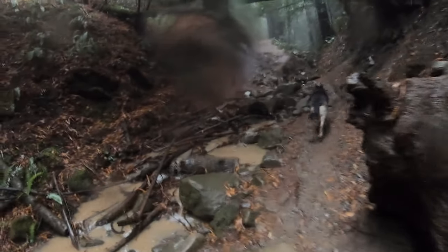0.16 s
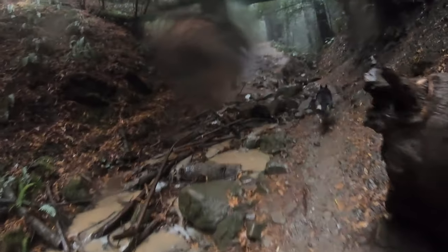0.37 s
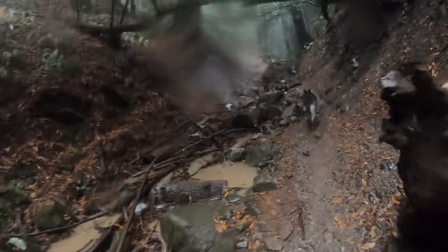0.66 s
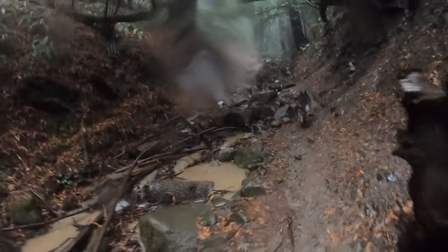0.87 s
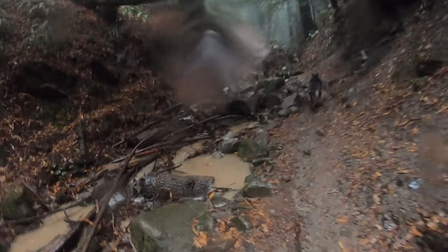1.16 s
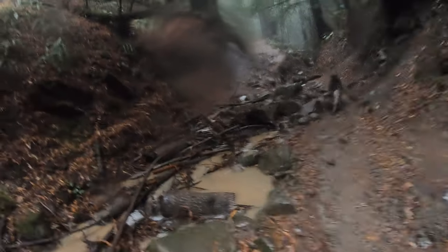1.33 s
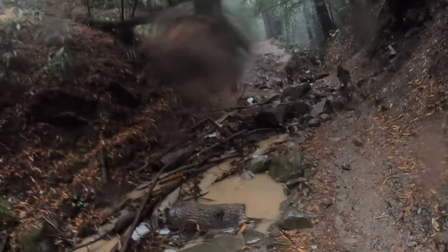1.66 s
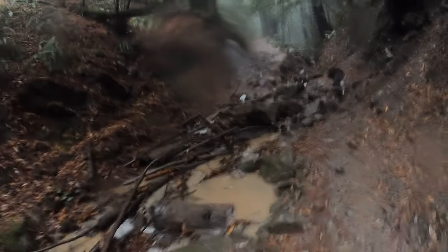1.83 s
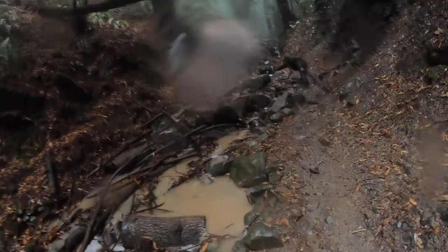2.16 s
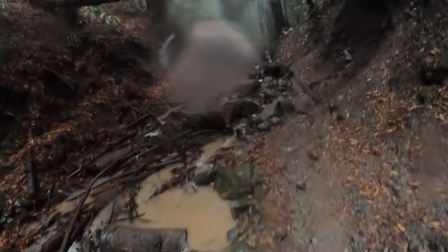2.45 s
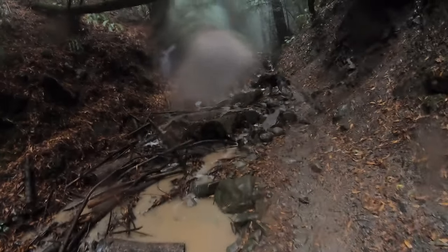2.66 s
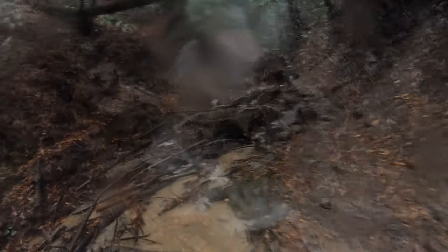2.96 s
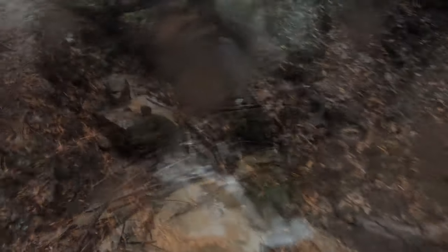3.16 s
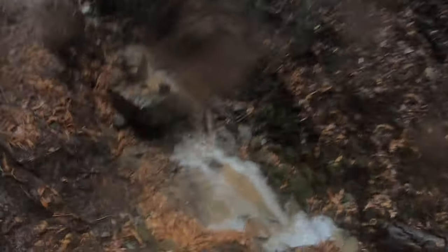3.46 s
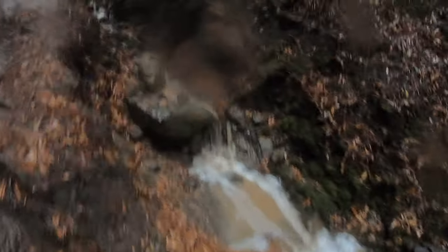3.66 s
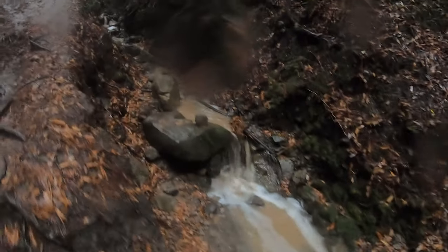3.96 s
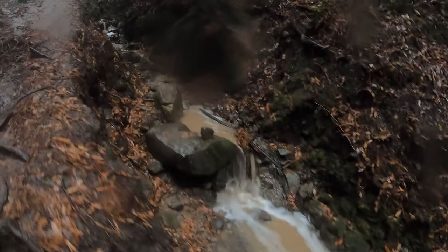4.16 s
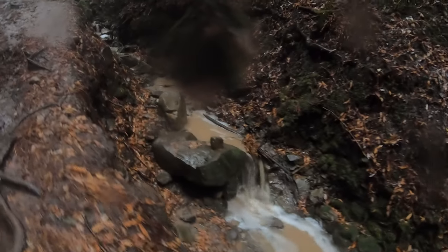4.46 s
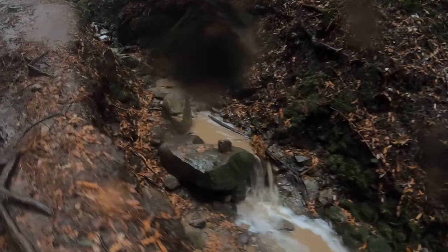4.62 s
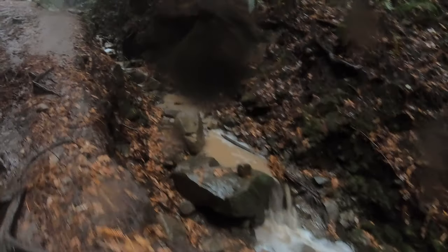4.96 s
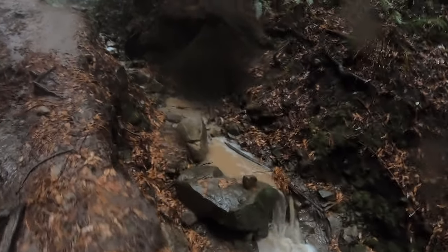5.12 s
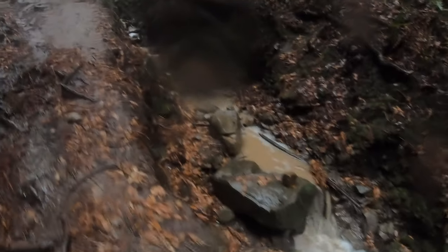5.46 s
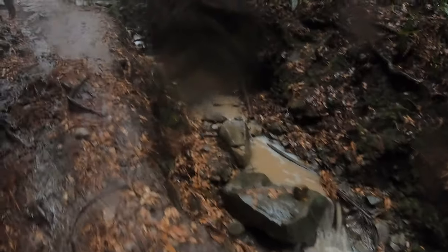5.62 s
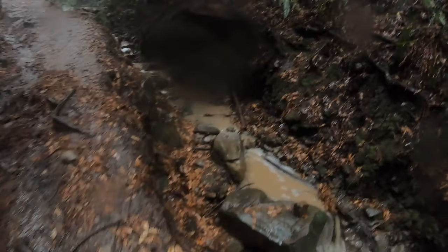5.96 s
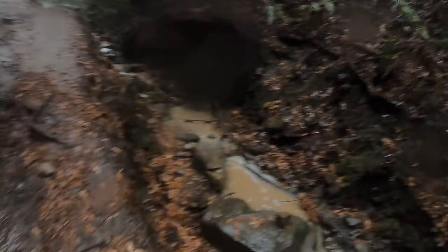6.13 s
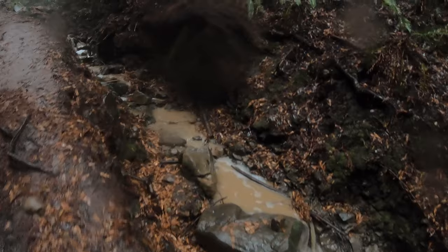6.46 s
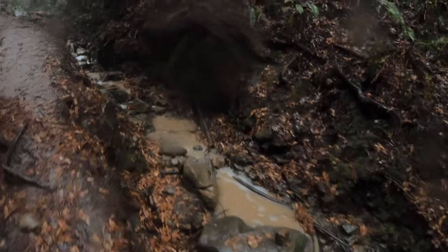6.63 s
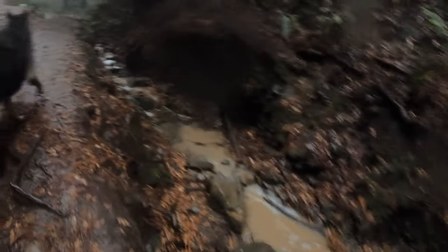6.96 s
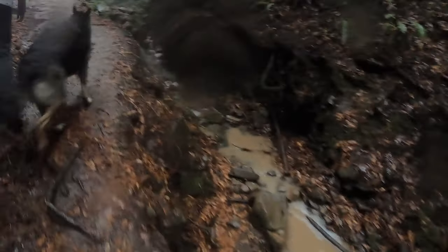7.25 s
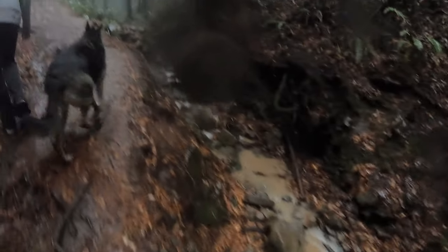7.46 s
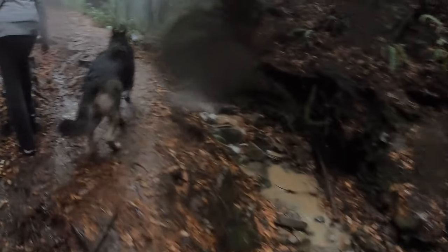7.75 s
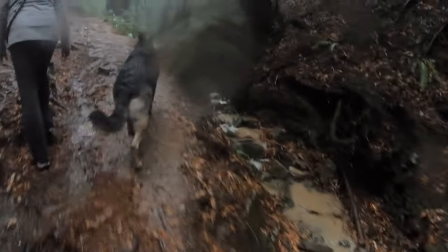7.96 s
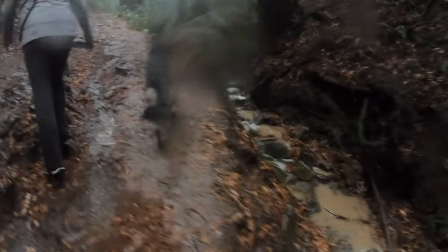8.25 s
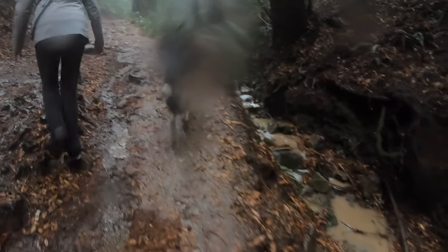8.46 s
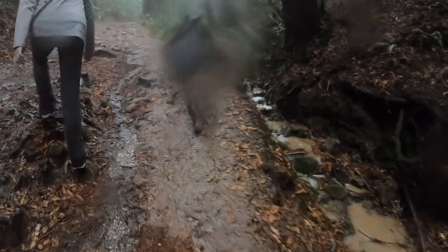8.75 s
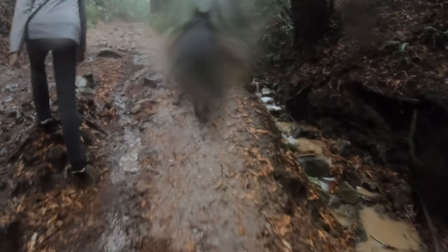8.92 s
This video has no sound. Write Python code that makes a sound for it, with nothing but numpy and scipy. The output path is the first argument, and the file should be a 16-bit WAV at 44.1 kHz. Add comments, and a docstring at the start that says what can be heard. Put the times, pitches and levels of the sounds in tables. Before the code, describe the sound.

Someone walks past a rocky creek in a rainy forest, carrying a small microphone. Water rushes and hisses throughout over a hollow gurgle, dotted with sharp drips and soft plops. Dull steps, brief mount rattles and wind gusts mark the first half. The sound leans right at first and evens out as the muffled left side clears. The creek swells midway, then recedes slightly, its gurgle deepening.

```python
"""A forest creek in the rain rushes, bubbles and gurgles over rocks, while drops tick and plop nearby.
A walker carries a small camera past it; the steps thud through its body and rattle its mount.
Low wind rumbles underneath. The left microphone port (its sound opening) is muffled by water and
clears in two stages; at times the camera feeds the left port to both channels."""
import sys
import numpy as np
from scipy import signal
from scipy.fft import rfft, irfft, next_fast_len
from scipy.io import wavfile
from scipy.ndimage import uniform_filter1d, map_coordinates

SR = 44100
rng = np.random.default_rng(int(sys.argv[2]) if len(sys.argv) > 2 else 0)


def waveform_to_disk(signal):
    """Save audio, clipped to [-1, 1], as 16-bit WAV at the path in sys.argv[1]."""
    frames = np.transpose(np.atleast_2d(signal))
    scaled = np.clip(frames, -1, 1) * 32767
    samples = np.round(scaled).astype(np.int16)
    wavfile.write(sys.argv[1], SR, samples)


N = 400869

# the creek as the walker passes: (time [s], rush [dB], spray [dB], finest hiss [dB], gurgle [dB])
CREEK_LEVELS = [(0, -42.5, -41.5, -72, -52), (1.0, -44.5, -42, -74, -51.5), (2.1, -43.5, -41.5, -73, -50),
                (3.0, -46, -44.5, -75, -53.5), (3.5, -39.5, -40.5, -69, -49.5), (3.95, -37, -38, -69, -47),
                (4.4, -38, -38, -68, -51.5), (4.7, -38.5, -39, -66, -49), (4.87, -37.5, -39.5, -66, -44),
                (5.05, -39, -39.5, -65, -49), (5.35, -40, -40, -66, -48.5), (5.75, -40.5, -40, -67, -54.5),
                (6.25, -39, -40.5, -67, -55), (6.9, -42, -40, -67, -53), (7.5, -42.5, -43, -66.5, -53),
                (8.3, -45, -46, -69, -55), (9.09, -44.5, -46, -71, -51.5)]
FINE_HISS_HZ = 11550  # the finest hiss lies above this; the channels blend only below it


def creek(half_clear, clear, turned):
    """Running water as each port hears it: a low rush, a bright spray and a very fine hiss."""
    # tone of the water at the wet, half clear and clear left port: (frequency [Hz], level [dB])
    wet_tone = [(300, 3.5), (600, -5.5), (1000, -10.5), (2000, -11), (3000, -12), (4500, -26), (6000, -22),
                (7800, -26), (9500, -31), (11000, -34.8), (13000, -37), (15000, -46.9)]
    half_tone = [(300, -1), (700, -7), (950, -4), (1350, -8), (1850, -5), (2800, -12.4), (3900, -11.5),
                 (4800, -19.5), (6200, -35), (7800, -29), (9200, -32.5), (10900, -46), (12000, -43),
                 (15000, -43)]
    clear_tone = [(300, -0.5), (620, -5), (1090, 0), (1380, -7.5), (1800, -3), (2310, -10.5), (3300, -14.5),
                  (4100, -3.5), (6000, -1), (7000, -16), (8500, -17), (11000, -35.5), (12000, -33),
                  (15000, -34)]
    # tone at the right port, facing the trail and facing the creek: (frequency [Hz], level [dB])
    trail_tone = [(300, 4.5), (550, -1.5), (1100, -1), (1500, -3), (2000, -2), (3000, -6.5), (4200, -14),
                  (5200, -6.5), (6200, 1.1), (7200, -3.5), (8500, -13.5), (10000, -20.5), (12000, -29.5),
                  (15000, -40.7)]
    creek_tone = [(300, 0), (700, -5.5), (1050, -7.5), (1600, -1.5), (2200, -8), (2800, -3), (4100, -15.5),
                  (6300, 4), (7200, 0), (8000, -10.5), (8600, -6.5), (10300, -22), (12500, -35),
                  (15000, -36.3)]
    # spray on the left compared with the right: (wet [dB], half clear [dB], clear [dB])
    left_spray_db = [-22.5, -14, -5]
    rush_db, spray_db, hiss_db, _ = curves(CREEK_LEVELS)
    rush_rise_db, spray_rise_db = spurts()
    rush_db, spray_db = rush_db + rush_rise_db, spray_db + spray_rise_db
    to_left, to_right, flurry_db = water()
    left_shares = [1 - half_clear - clear, half_clear, clear]
    left = port([to_left] * 3, [wet_tone, half_tone, clear_tone], left_shares,
                rush_db - 7, [spray_db + db for db in left_spray_db])
    right = port(to_right, [trail_tone, creek_tone], [1 - turned, turned], rush_db, [spray_db] * 2)
    hiss = unit(filtered(to_right[0], lambda hz: above(hz, FINE_HISS_HZ, 40) * below(hz, 14800, 30)))
    flicker_db = 0.88 * flurry_db + 0.65 * wobble(14)
    right = filtered(right, lambda hz: below(hz, FINE_HISS_HZ, 40))
    return np.array([left, right + amp(hiss_db + spray_rise_db + flicker_db) * hiss])


def water():
    """Rushing noise, ringing bubbles and rain ticks; the two ports share only part of this sound."""
    # how alike the two ports sound: (frequency [Hz], likeness [0-1])
    likeness = [(150, 0.99), (700, 0.5), (2000, 0.52), (4500, 0.47), (7000, 0.21), (12000, .05)]
    # how far the right port's wave runs ahead, facing trail or creek: (frequency [Hz], phase [radians])
    trail_lead = [(700, 0), (1380, -1.4), (1900, -0.2), (2400, 1.1), (3100, 4.1), (3800, 4.5), (4500, 7.5),
                  (5200, 7.5), (6000, 9), (9000, 12)]
    creek_lead = [(900, .5), (1380, -0.9), (1900, -1.2), (2400, 1), (3100, 4.5), (3800, 6.5), (4500, 11),
                  (6000, 9.5), (9000, 8)]
    bubbles = shower(count=2500, centre_hz=1202.4, spread=0.2432, spiky_db=2,
                     cycles=6.64, rise=0.0507, size=900)
    ticks = [shower(count=6000, centre_hz=7160, spread=0.191, spiky_db=3.5, cycles=0.71, rise=0, size=60)
             for side in "LR"]
    shared, right_only = patchy_noise(depth_db=1.27)
    glugs = shower(count=500, centre_hz=653.4, spread=.3, spiky_db=2.5, cycles=9.7, rise=0.0406, size=2000)
    fizz = shower(count=9000, centre_hz=4500, spread=.35, spiky_db=2.5, cycles=12.2, rise=0.02, size=300)
    shared += amp(-16.5) * bubbles + amp(-21) * glugs + amp(-10) * fizz + amp(-13) * ticks[0]
    alike = [filtered(shared, lambda hz: along(likeness, hz) * np.exp(1j * along(lead, hz)))
             for lead in (trail_lead, creek_lead)]
    unlike = filtered(right_only, lambda hz: np.sqrt(1 - along(likeness, hz) ** 2))
    right = np.array(alike) + unlike + amp(-11) * ticks[1]
    flurry_db = 0.42 * wobble(9) + flurries(count=170, jump_db=3.0, fade_s=0.015)
    return shared * amp(flurry_db), right * amp(flurry_db), flurry_db


def port(waters, tones, shares, rush_db, sprays_db):
    """A port colours the water with a changing mix of tones; it rings in the bright spray range."""
    spray_hz = 3710  # rush lies below, spray above
    out = 0
    for sound, tone, share, spray_db in zip(waters, tones, shares, sprays_db):
        colour = lambda hz: amp(along(tone, hz)) * above(hz, 240, 4)
        rush = unit(filtered(sound, lambda hz: colour(hz) * below(hz, spray_hz, 12)))
        spray = unit(filtered(sound, lambda hz: colour(hz) * above(hz, spray_hz, 12)))
        out = out + np.clip(share, 0, 1) * (amp(rush_db) * rush + amp(spray_db) * spray)
    return out


def spurts():
    """Sudden rises in rush and spray that trail off, as of wet leaves brushed or water flung."""
    # each spurt: (time [s], length [s], rise of rush [dB], rise of spray [dB])
    bursts = [(0.3, 0.028, 2.5, 10.5), (0.927, 0.0062, 2, 7), (1.372, 0.074, 3.5, 4),
              (1.875, 0.032, 1.5, 0.5), (1.925, 0.014, 5.5, 0), (3.894, 0.0022, 4, 11),
              (6.223, 0.0034, 3, 7), (6.291, .004, 2, 6)]
    rise_db = np.zeros((2, N))
    for start, length, rush_db, spray_db in bursts:
        t = np.arange(round(3 * length * SR)) / SR
        fade = 1 / (1 + (t / length) ** 3)
        at = round(start * SR)
        rise_db[:, at:at + len(t)] += np.outer([rush_db, spray_db], fade)
    return uniform_filter1d(rise_db, size=20)


def flurries(count, jump_db, fade_s):
    """Short showers of spray make the water's level jump at random and sink back."""
    when, strength = rng.random((count, 2)).T
    jumps = np.bincount((when * N).astype(int), jump_db * strength, N)
    fade = np.exp(-np.arange(SR // 5) / SR / fade_s)
    return signal.fftconvolve(jumps, fade)[:N]


def gurgle():
    """The hollow gurgle of falling water, which deepens as the walker leaves it behind."""
    # tone of the gurgle from near and from far: (frequency [Hz], level [dB])
    near_tone = [(60, -120), (105, -32), (135, 0.5), (190, 4), (250, -2), (330, -24.5), (500, -25),
                 (900, -120)]
    far_tone = [(70, -120), (105, -32), (128, 0.5), (165, 4.5), (220, -3), (300, -21), (500, -24),
                (900, -120)]
    leave_s, gone_s = 6.6, 7.93
    far = np.interp(np.arange(N) / SR, [leave_s, gone_s], [0, np.pi / 2])
    shared, right_only = np.cos(far) * toned_noise(near_tone) + np.sin(far) * toned_noise(far_tone)
    swell = amp(1.33 * wobble(13) + 1.9 * wobble(5))
    sound = unit(swell * np.array([shared, shared + .5 * right_only]))
    *_, gurgle_db = curves(CREEK_LEVELS)
    return amp(gurgle_db) * sound * amp([[0.1], [2.5]])


def raindrops(clear):
    """Nearby drops tick in the narrow band where the ports ring; water on the left port dims them."""
    # each drop: (time [s], level [dB], pitch [Hz])
    drops = [(0.196, -27, 6060), (0.3017, -33, 6690), (0.5566, -33, 7060), (0.942, -25, 6460),
             (1.0156, -31, 6210), (1.3857, -28, 6200), (1.4032, -25, 6160), (1.6094, -21.5, 6100),
             (2.2283, -35, 6370), (2.3675, -32, 6290), (2.9836, -34, 6050), (4.5191, -27, 6960),
             (6.1424, -37, 4370), (6.2856, -25, 5640), (6.288, -17, 5620), (6.2899, -25, 5510),
             (6.6382, -24, 4733), (6.6543, -26, 5090), (6.9546, -29, 5460), (7.0259, -31, 5067),
             (7.1013, -32, 5700), (7.225, -27.5, 5010), (7.4769, -18.5, 4640), (7.8296, -30, 5500),
             (8.607, -30, 5100), (8.7023, -30, 6010)]
    low_hz, high_hz, wet_db = 3800, 7400, -15
    ticks = splashes(*np.transpose(drops), cycles=1.7, rebound_db=-5.5)
    ticks = filtered(ticks, lambda hz: above(hz, low_hz, 10) * below(hz, high_hz, 10))
    return np.array([ticks * amp(8.5 + wet_db * (1 - clear)), ticks * amp(11.5)])


def plops():
    """Low plops and taps on mud, puddles and pebbles, louder on the right."""
    # each plop: (time [s], level [dB], pitch [Hz], fade time [cycles])
    hits = [(.187, -39, 1920, 2.7), (1.34, -41.5, 692, 4.8), (1.687, -29, 416, 0.97),
            (1.924, -33, 890, 0.52), (2.654, -34.5, 1490, 0.88), (2.655, -35, 465, 1.8),
            (2.92, -29, 370, 2.2), (3.68, -36.5, 844, 7.1), (4.044, -28, 417, 1.8), (4.578, -35, 230, 1.5),
            (5.039, -38, 1410, 2.3), (5.285, -31, 302, 2.1), (5.315, -37, 335, 2.5), (5.56, -42, 780, 4.8),
            (5.639, -32, 1890, 2.7), (6.1, -32, 1780, 2.6), (6.199, -34, 247, 1.4),
            (6.29, -34, 740.5, 1.52), (6.475, -31, 1140, 2.6), (6.718, -37, 230, 1.4),
            (7.733, -35.5, 1656, 4), (8.699, -35.5, 286.2, 1.7)]
    return splashes(*np.transpose(hits), rebound_db=-1) * amp([[0], [11]])


def splashes(times, db, hz, cycles, rebound_db):
    """A landing drop rings briefly, then rebounds more weakly."""
    rebound_s = 0.00129
    hit = rings(times, amp(db), hz, cycles, size=2000)
    return hit + amp(rebound_db) * np.roll(hit, round(rebound_s * SR))


def footsteps(clear):
    """Steps thud softly through the camera body; the left port hears less, above all when wet."""
    # each thud: (time [s], level [dB], pitch [Hz])
    steps = [(0.332, -39, 125), (0.374, -29, 88), (0.41, -34, 55), (0.485, -31, 103), (0.59, -19.5, 123),
             (0.637, -34, 123), (0.721, -33, 174), (0.774, -29, 142), (0.952, -27.5, 103), (1.19, -36, 150),
             (1.688, -20.5, 152), (1.751, -26, 109), (2.08, -27, 145), (2.116, -8.5, 114),
             (2.152, -21.5, 106), (2.312, -30, 170), (2.7, -32.5, 160), (3.166, -28, 135),
             (3.429, -34, 120), (4.66, -40, 173), (4.821, -28, 151), (4.866, -23, 131), (4.911, -34, 133),
             (4.956, -32, 135), (5.259, -31, 162), (5.307, -27, 126), (5.56, -34, 140), (6.3, -46, 85),
             (6.72, -41, 95), (6.945, -40, 83), (7.95, -44, 80), (8.75, -41, 80)]
    times, db, hz = np.transpose(steps)
    thuds = rings(times, amp(db + 6.5), hz, cycles=1.6, size=4000, contact_s=0.00782)
    return np.array([amp(-30 + 20 * clear) * thuds, thuds])


def mount_knocks():
    """Each knock rings the camera mount and shakes the two ports in opposite directions."""
    # the mount's natural notes: (pitch [Hz], level [dB], time to fade by 60 dB [s])
    notes = [(233, -7.5, 0.067), (318.6, 3.5, 0.057), (447.6, 4, 0.037), (593, -6, 0.024), (719, -1, 0.027),
             (900, -8, 0.015)]
    times, knock_db = mount_contacts()
    scatter_db = rng.normal(0, 0.36, (len(times), len(notes)))
    hard_db = -14  # knocks softer than this sound duller
    tilt_db = 0.45 * np.minimum(knock_db - hard_db, 0)
    out = np.zeros((2, N))
    for (hz, note_db, fade_s), random_db in zip(notes, scatter_db.T):
        octaves = np.log2(hz / 330)
        gain = amp(knock_db + tilt_db * octaves + note_db + random_db)
        cycles = hz * fade_s / np.log(1000)
        note = rings(times, gain, np.full(len(times), hz), cycles, size=2500, contact_s=0.00415)
        out[0] -= amp(-10.5 + 1.5 * octaves) * note  # the left feels less, least of the low notes
        out[1] += note
    return out


def mount_contacts():
    """Times and levels of all knocks; a rattle is a quick, uneven run that swells and fades."""
    # single knocks: (time [s], level [dB])
    knocks = [(0.588, -5), (0.596, -13), (0.774, -15.5), (0.788, -28), (2.112, -2), (2.127, -2.5),
              (3.145, -10), (3.162, -4), (3.176, -29), (4.868, -23.5), (4.948, -28.5), (5.281, -30)]
    # rattles: (time [s], length [s], level [dB])
    rattles = [(0.605, 0.039, -22), (0.693, 0.061, -28.5), (2.077, 0.041, -25), (2.14, 0.059, -30),
               (2.278, 0.065, -25.5), (2.691, 0.039, -25), (4.82, 0.066, -25), (5.282, .055, -28)]
    gap_s, hits = .011, 7
    start, length, rattle_db = np.transpose(rattles)[:, :, None]
    jitter, scatter = rng.normal(0, 1, (2, len(rattles), hits))
    delay = gap_s * (np.arange(hits) + .5 + .15 * jitter)
    swell = np.sin(np.pi * np.clip(delay / length, 0, 1)) + 1e-6
    level_db = rattle_db + 20 * np.log10(swell) + 1.5 * scatter
    return np.hstack([np.transpose(knocks), [(start + delay).ravel(), level_db.ravel()]])


def wind():
    """Gusts make a deep rumble and a slightly higher shudder, from separate noise at each port."""
    # strength of the gusts: (time [s], level [dB])
    gusts = [(0.0, -56), (0.17, -65), (0.38, -40.5), (0.91, -58), (0.93, -41.5), (1.41, -62), (1.8, -38),
             (1.92, -67), (2.15, -29.5), (2.25, -59), (2.76, -64), (2.81, -50), (3.82, -62), (5.32, -48),
             (5.62, -78), (5.9, -56), (8.45, -78), (9.09, -75)]
    # tone of the rumble and of the shudder: (frequency [Hz], level [dB])
    rumble_tone = [(15, -13), (30, 10.5), (50, 6.5), (75, -16), (200, -120)]
    shudder_tone = [(30, -62), (55, 6), (80, 4), (115, -2), (140, -29), (300, -120)]
    rumble_db, = curves(gusts)
    calm_db = -55
    shudder_db = -63 + 0.4 * (rumble_db - calm_db)
    buffeting = amp(2.2 * wobble(3.6) + np.array([3.7 * wobble(11), 1.4 * wobble(9)]))
    rumble = amp(rumble_db) * unit(buffeting * toned_noise(rumble_tone))
    shudder = amp(shudder_db) * unit(buffeting * toned_noise(shudder_tone))
    return (rumble + shudder) * amp([[-5], [4.5]])


def rings(times, gain, hz, cycles, size, rise=0, contact_s=0):
    """Fading notes, size samples long; rise bends the pitch up, and the wave crests at contact_s."""
    t = np.arange(size) / SR
    age = t * (hz / cycles)[:, None]
    envelope = np.exp(-age) * (1 - np.exp(-5 * age)) ** 2
    wave = np.cos(2 * np.pi * hz[:, None] * (t * (1 + rise * age) - contact_s))
    at = np.round(times * SR).astype(int)[:, None] + np.arange(size)
    return np.bincount(at.ravel(), (gain[:, None] * envelope * wave).ravel(), N + size)[:N]


def shower(count, centre_hz, spread, spiky_db, cycles, rise, size):
    """Many tiny rings at random times and pitches; spiky_db makes a few stand out."""
    when, softness, pitch = rng.random((count, 3)).T
    hz = np.clip(centre_hz * (pitch / (1 - pitch)) ** spread, 200, 14000)
    gain = amp(-spiky_db * np.log(softness + 0.023))
    return unit(rings(when * N / SR, gain, hz, cycles, size, rise))


def patchy_noise(depth_db):
    """Two noises whose loudness varies in small patches of time and frequency."""
    spectrum = signal.stft(rng.standard_normal((2, N)), nperseg=512)[2]
    patches = rng.standard_normal(spectrum.shape[1:])
    patches = uniform_filter1d(uniform_filter1d(patches, 8, axis=0), 8, axis=1)
    spectrum *= amp(depth_db * patches / patches.std())
    return unit(signal.istft(spectrum, nperseg=512)[1][:, :N])


def toned_noise(tone):
    """Two separate noises shaped by the same tone table."""
    return filtered(rng.standard_normal((2, N)), lambda hz: amp(along(tone, hz)))


def amp(db):
    """Turn decibels into a gain to multiply by."""
    return 10 ** (np.asarray(db) / 20)


def unit(x):
    """Scale a sound to an average power of 1."""
    return x / np.sqrt(np.mean(x ** 2, axis=-1, keepdims=True) + 1e-20)


def along(points, hz):
    """Read between the rows of a (frequency, value) table, with octaves evenly spaced."""
    frequencies, values = np.transpose(points)
    return np.interp(np.log(hz + 1), np.log(frequencies + 1), values)


def curves(rows):
    """One value per sample for each column after the time."""
    times, *columns = np.transpose(rows)
    return [np.interp(np.arange(N) / SR, times, column) for column in columns]


def wobble(rate):
    """A smooth curve through rate random points a second."""
    return map_coordinates(rng.standard_normal(int(N * rate / SR) + 4), [np.arange(N) * rate / SR])


def filtered(x, response):
    """Multiply each frequency in x by response(hz)."""
    size = next_fast_len(N + 8192)
    return irfft(rfft(x, size) * response(np.fft.rfftfreq(size, 1 / SR)), size)[..., :N]


def below(hz, edge_hz, steepness):
    """A gain that keeps frequencies below the edge."""
    return 1 / (1 + (hz / edge_hz) ** steepness)


def above(hz, edge_hz, steepness):
    """A gain that keeps frequencies above the edge."""
    return 1 - below(hz, edge_hz, steepness)


def scene():
    """Everything that reaches the left and right ports."""
    # the camera: (time [s], left port half clear [0-1], left port clear [0-1], turned to creek [0-1])
    camera_state = [(0, 0.17, 0.02, 0.25), (3.1, 0.3, 0, 0.04), (3.35, 1, 0.02, 1), (5.15, 0.22, 0, 0.75),
                    (5.3, 0, 0.4, 0.5), (5.9, 0, 0.98, 1)]
    half_clear, clear, turned = curves(camera_state)
    forest = creek(half_clear, clear, turned) + wind() + gurgle() + raindrops(clear) + plops()
    return forest + footsteps(clear) + mount_knocks()


def record(dry):
    """The camera blends its ports, turns loud jolts down and cuts the highest treble."""
    # how much of the right channel comes from the right port: (time [s], share [0-1])
    right_share = [(0, 0.96), (2.95, 0.98), (3.2, 0.59), (3.4, 0.24), (3.7, 0), (3.92, 0), (4.2, 0.4),
                   (4.75, 0.94), (5.15, 1), (5.45, 0.46), (5.9, 0.07), (6.3, 0), (6.6, 0)]
    limit, recover_s, top_hz = .55, 0.027, 15800
    share, = curves(right_share)
    difference = filtered(dry[1] - dry[0], lambda hz: below(hz, FINE_HISS_HZ, 40))
    mix = np.array([dry[0], dry[1] - (1 - share) * difference])
    # the volume drops quickly on a peak above the limit, then creeps back
    cut = 1 - np.minimum(1, limit / (np.abs(mix).max(0) + 1e-9))
    fade = np.arange(N) / SR / recover_s
    held_cut = np.exp(np.maximum.accumulate(np.log(cut + 1e-9) + fade) - fade)
    gain = 1 - uniform_filter1d(held_cut, size=90, origin=-30)
    return filtered(mix * gain, lambda hz: hz < top_hz)


dry = scene()
out = record(dry)
waveform_to_disk(out)
```